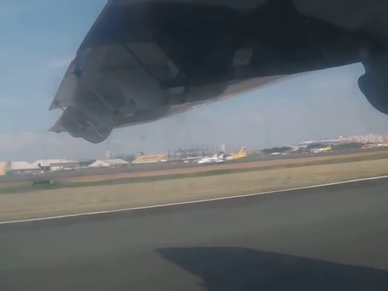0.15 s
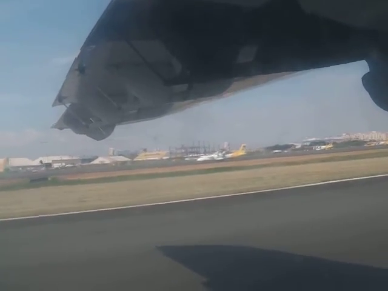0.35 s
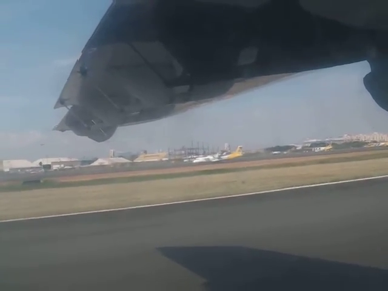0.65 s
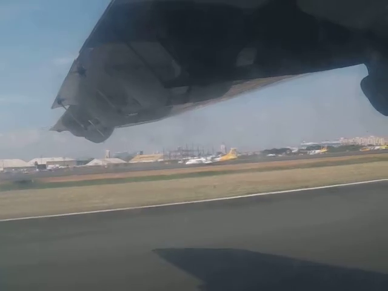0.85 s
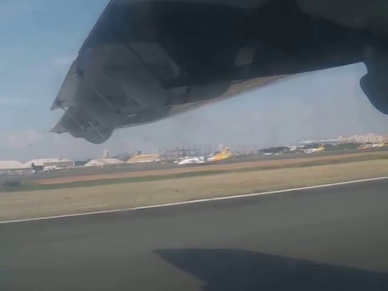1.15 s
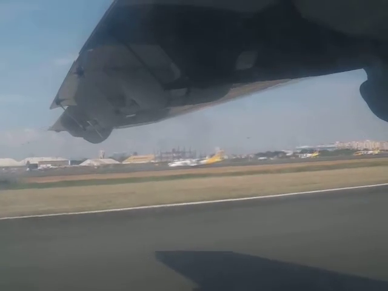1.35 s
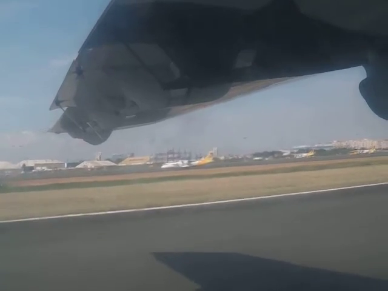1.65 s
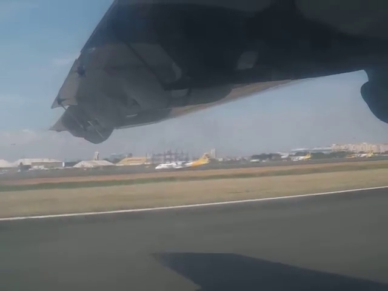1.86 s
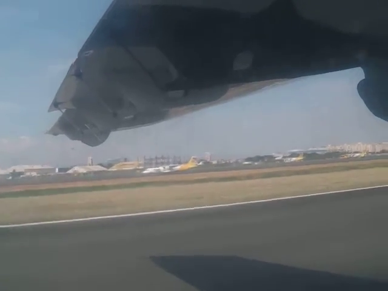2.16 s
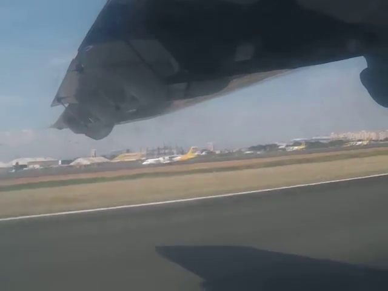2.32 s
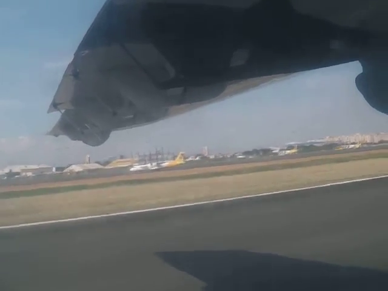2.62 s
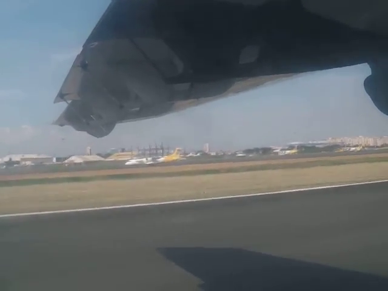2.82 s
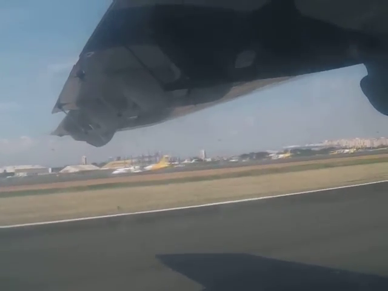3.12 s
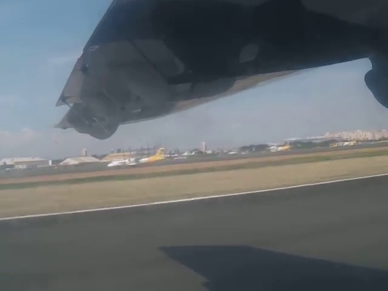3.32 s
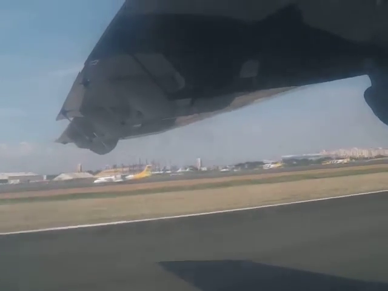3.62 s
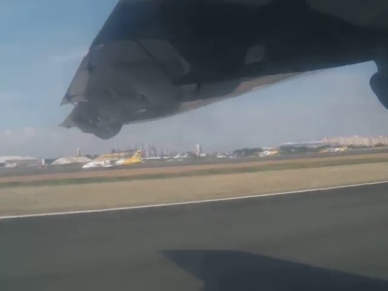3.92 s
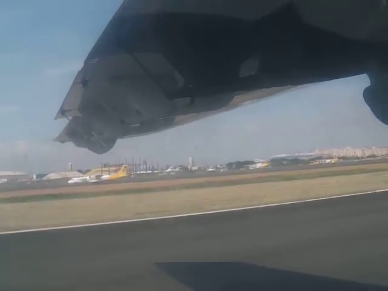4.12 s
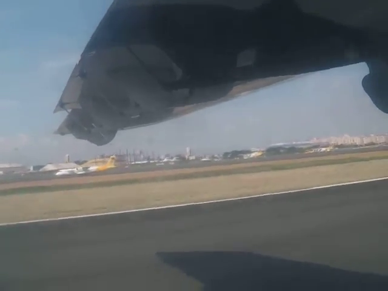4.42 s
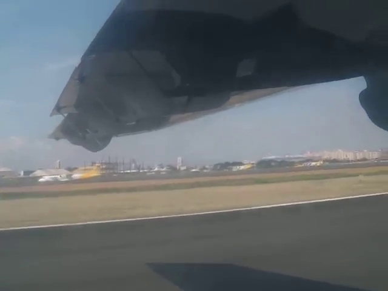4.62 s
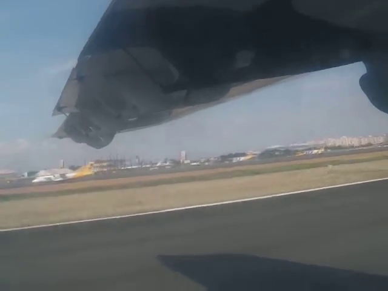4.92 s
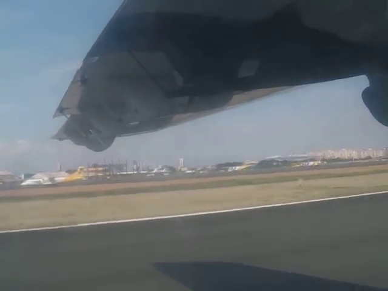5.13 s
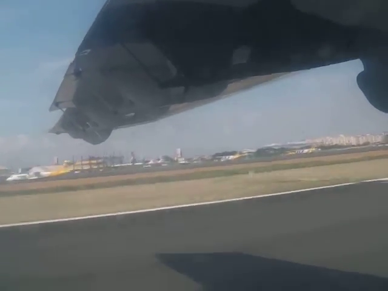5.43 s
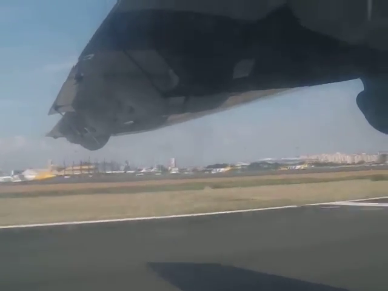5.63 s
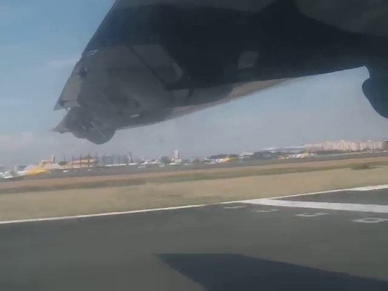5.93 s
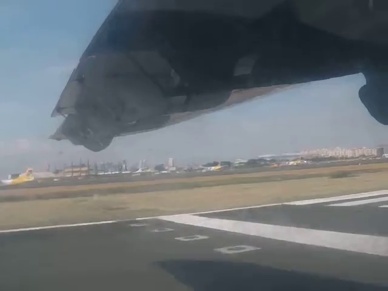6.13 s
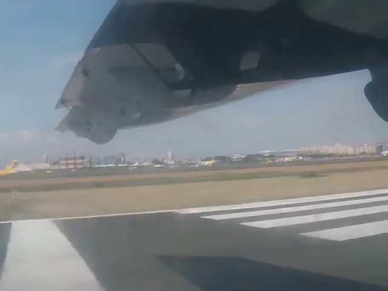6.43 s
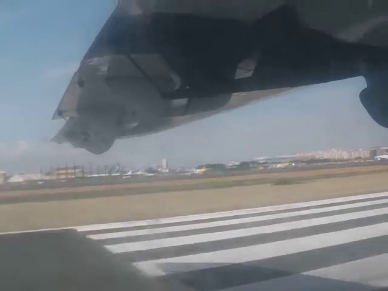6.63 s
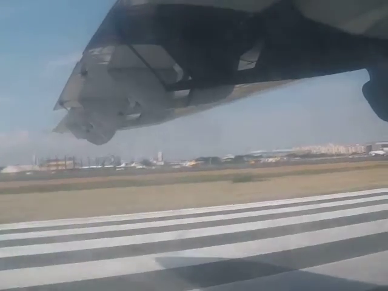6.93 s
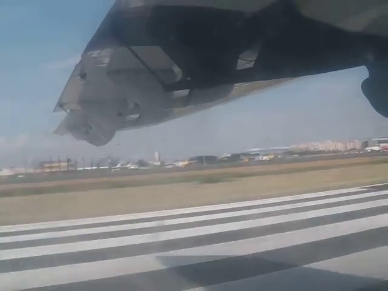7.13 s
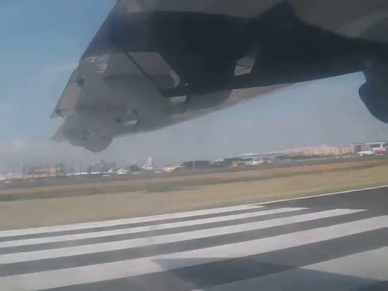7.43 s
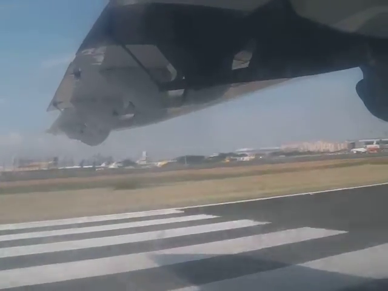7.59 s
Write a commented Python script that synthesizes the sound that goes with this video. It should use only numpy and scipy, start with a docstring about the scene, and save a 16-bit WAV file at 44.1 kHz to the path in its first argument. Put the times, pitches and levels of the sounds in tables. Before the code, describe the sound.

For nearly 8 seconds, a loud twin-propeller drone fills an aircraft cabin, heard by a microphone at a window seat while the plane rolls on the ground. Two deep, almost pure hums around 105 Hz beat together, with lulls about 0.6 s apart at first and 0.4 s by the end. In each lull automatic leveling lifts the roar of the vibrating wall; brief extra surges of roar and treble come near 0.3, 0.9, 2.6, 3.8 and 4.9 s, with smaller ones around 7. Rasping air hiss and a shimmering, very high turbine whistle near 12 kHz are chopped at the blade rate. A dry click lands at 0.8 s; short low thumps at 0.95, 2.0 and 4.9 s momentarily duck the sound. A thin wavering gear whine grows from about 3 s as a mid-band draught steadily fades. The drone continues to the end without stopping.

```python
"""A twin turboprop taxis, heard from a window seat for 7.8 s.
From the start two propeller hums beat, the lulls closing up from about 0.6 to 0.4 s apart; wash roars in the
cabin wall, intake air hisses and the compressor whistles as a comb of lines, all chopped at the blade rate;
roar and treble swell briefly, mostly in the lulls. A dry click falls at 0.8 s, short low thumps at 0.95, 2.0
and 4.9 s, each making the gain duck; a gear whine grows while the nacelle draught fades.
Throughout, a gain control holds the hum down and lets the roar swell each time the propellers cancel."""
import sys
import numpy as np
from scipy.fft import rfft, irfft, next_fast_len
from scipy.io import wavfile
from scipy.ndimage import uniform_filter1d, minimum_filter1d, map_coordinates

SR = 44100
rng = np.random.default_rng(int(sys.argv[2]) if len(sys.argv) > 2 else 0)


def master(y):
    """Save y as 16-bit WAV."""
    cut = np.clip(np.atleast_2d(y).T, -1, 1)
    pcm = np.round(cut * 32767)  # scale
    wavfile.write(sys.argv[1], SR, pcm.astype(np.int16))


N = 342216
TIME = np.arange(N) / SR  # s


def amp(db):
    """Decibels to amplitude gain."""
    return np.exp(np.asarray(db) * np.log(10) / 20)


def unit(x):
    """Scale to rms 1."""
    return x / np.sqrt(np.mean(x ** 2) + 1e-20)


def along(points, hz):
    """Interpolate (f/Hz, value) points on a log frequency axis."""
    f, v = np.transpose(points)
    return np.interp(np.log(hz + 1), np.log(f + 1), v)


def curve(points):
    """Interpolate (t/s, value) points to one value per sample."""
    t, v = np.transpose(points)
    return np.interp(TIME, t, v)


def wobble(rate_hz):
    """Smooth random curve: a cubic spline through rate_hz normal knots a second."""
    knots = rng.standard_normal(int(N * rate_hz / SR) + 4)
    coarse = TIME[::64]
    return np.interp(TIME, coarse, map_coordinates(knots, [coarse * rate_hz]))


def swells(rows):
    """Sum of Gaussian lifts in dB from (t/s, half length/s, lift/dB) rows."""
    return sum(db * np.exp(-((TIME - t) / half_s) ** 2) for t, half_s, db in rows)


def tone(turns):
    """Sine of rms 1 from its phase in turns."""
    return np.sqrt(2) * np.cos(2 * np.pi * (turns - np.floor(turns)).astype(np.float32))


def filtered(x, response):
    """Multiply the spectrum of x by a response of frequency in Hz."""
    m = next_fast_len(N + 8192)
    return irfft(rfft(x, m) * response(np.fft.rfftfreq(m, 1 / SR)), m)[..., :N]


def noise(spectrum):
    """Stereo noise of rms 1: alike left and right in the bass, unlike to opposed in the treble."""
    # left-right correlation: f/Hz, correlation/-1..1
    alike = [(100, .996), (500, .999), (1200, .985), (1500, .95), (2000, .65), (3300, .5), (5500, .42),
             (7000, .1), (9000, 0), (11500, -.45), (15000, -.46)]

    def colour(hz):
        turn_rad = np.arccos(np.clip(along(alike, hz), -1, 1)) / 2
        return amp(along(spectrum, hz)) * np.array([np.cos(turn_rad), np.sin(turn_rad)])

    mid, side = filtered(rng.standard_normal((2, N)), colour)
    return unit(np.array([mid + side, mid - side]))


def propellers():
    """Blade passages so far; the near propeller gains one blade on the far one from lull to lull."""
    # blade-passing rate, mean of both propellers: t/s, f/Hz
    blade_rate = [(0, 105.6), (1.1, 105.7), (2.2, 106.4), (3.5, 105.6), (5.1, 104.6), (6.1, 105.2),
                  (7.76, 104.7)]
    # lulls, where the two hums cancel: t/s
    lull_times = [-.3, .245, .835, 1.385, 1.95, 2.575, 3.215, 3.746, 4.332, 4.85, 5.33, 5.728, 6.11, 6.49,
                  6.84, 7.23, 7.625, 8.02]
    mean = np.cumsum(curve(blade_rate)) / SR
    # half a blade apart at each lull
    lead = np.interp(TIME, lull_times, np.arange(len(lull_times)) + .5)
    return mean + lead / 2, mean - lead / 2


def chop(blades, depth, sharpness):
    """Gain of rms 1 that rises in a burst at every blade passage."""
    return unit(1 + depth * np.exp(sharpness * (np.cos(2 * np.pi * blades) - 1)))


def surges():
    """Brief swells, mostly in the hum lulls: lift in dB of the wall roar, and of the rush and treble."""
    # t/s, half length/s, wall lift/dB, rush and treble lift/dB
    surge_rows = [(.262, .07, 4.5, 6), (.89, .075, 4.5, 6.5), (1.956, .015, 2.5, 4),
                  (2.585, .055, 3.5, 6.5), (3.19, .09, 2.5, 4), (3.81, .075, 4, 5.5), (4.9, .045, 5, 5),
                  (5.76, .04, 4.5, 2.5), (6.951, .02, 5, 2), (7.245, .06, 3, 3.5)]
    wall_surge_db = swells((t, half_s, wall_db) for t, half_s, wall_db, _ in surge_rows)
    air_surge_db = swells((t, half_s, air_db) for t, half_s, _, air_db in surge_rows)
    return wall_surge_db, air_surge_db


def click(at_s, level_db, t60_s):
    """One dry click: a sudden step that decays at once."""
    age_s = np.maximum(TIME - at_s, 0)
    return -amp(level_db - 60 * age_s / t60_s) * (TIME >= at_s)


def thumps(ring_hz, width_s):
    """Short low thumps: each is a cosine in a Gaussian envelope, strong enough to make the gain duck."""
    # t/s, peak/dB
    thump_rows = [(.95, 7), (1.965, 6.5), (4.916, 6)]
    out = np.zeros(N)
    for t, peak_db in thump_rows:
        near_by = np.abs(TIME - t) < 5 * width_s
        age_s = TIME[near_by] - t
        pulse = np.exp(-(age_s / width_s) ** 2) * np.cos(2 * np.pi * ring_hz * age_s)
        out[near_by] += amp(peak_db) * pulse
    return out


def draught(start_db, fade_db_per_s):
    """Air drawn past the nacelle: band noise that fades steadily."""
    # spectrum: f/Hz, relative density/dB
    nacelle = [(900, -10), (1600, 0.5), (1900, 0), (2750, -4.5), (3200, -14), (5000, -45)]
    return amp(start_db - fade_db_per_s * TIME) * noise(nacelle)


def gearbox(mesh_hz, flutter_hz, flicker_db):
    """Gear mesh: a thin tone with random pitch flutter, growing out of the roar and flaring briefly."""
    # whine level: t/s, level/dB
    growth = [(0, -55), (2.8, -45), (4.8, -41.5), (7.76, -40)]
    # flares: t/s, half length/s, lift/dB
    flares = [(3.3, .05, 6), (4.95, .05, 7), (5.4, .09, 4), (6.85, .04, 5), (7.25, .04, 8)]
    turns = np.cumsum(mesh_hz + flutter_hz * wobble(70)) / SR
    level_db = curve(growth) + swells(flares) + flicker_db * wobble(14)
    port_db = np.array([wobble(13), wobble(6.1)])
    return amp(level_db + port_db) * tone(turns)


def whistle(near, level_db):
    """The propeller chops the compressor tone into a comb of thin lines, each waxing and waning alone."""
    # compressor blade tone: t/s, f/Hz
    turbine = [(0, 11998), (.5, 11988), (.95, 11968), (1.25, 11992), (1.8, 12068), (2.15, 12070),
               (2.75, 12020), (3.3, 12010), (3.6, 11980), (3.95, 11918), (4.5, 11885), (5.15, 11857),
               (6.1, 11882), (7.1, 11912), (7.76, 11917)]
    # lines: order/blade-passing rates, level at t=0/dB, drift/(dB/s), lag between ports/turns
    sidebands = [(-7, -13, .6, .36), (-6, -11, 0, .41), (-4, -5.5, 1.2, .3), (-3, -8, .3, .45),
                 (-2, -6, .5, .37), (-1, -3, -.1, .42), (0, 2, -.7, .4), (1, -3, -1.2, .38),
                 (2, -5.5, .6, .41), (3, -9, 1.3, .45), (4, -16, 1.1, .5)]
    # spells in which one line sings out: order, t/s, half length/s, lift/dB
    streaks = [(-2, .2, .35, 6), (-2, 1.1, .45, 6), (0, 1.6, .2, 3), (-4, 2.7, .45, 8), (-6, 3.05, .35, 10),
               (-7, 3.2, .4, 7), (-1, 3.6, .7, 5), (3, 4.2, .25, 6), (2, 4.3, .25, 3), (3, 5.6, .25, 4),
               (3, 7.1, .45, 4), (0, 7.2, .6, 6)]
    fade_db, wander_turns, lag_sway_turns = 2.2, .135, .1  # random swing of each line
    carrier = np.cumsum(curve(turbine) + 3 * wobble(25)) / SR
    out = np.zeros((2, N))
    for order, line_db, drift_db_per_s, lag_turns in sidebands:
        line = carrier + order * near + wander_turns * wobble(16)
        streak_db = swells(spell for which, *spell in streaks if which == order)
        gain = amp(line_db + drift_db_per_s * TIME + streak_db + fade_db * wobble(13))
        for port in range(2):
            phase = line - port * lag_turns + lag_sway_turns * wobble(6)
            out[port] += gain * amp(wobble(8.8)) * tone(phase)
    return amp(level_db) * unit(out)


def air(near, hiss_db, intake_db, hiss_ease_db_per_s):
    """Blade-tip hiss, easing off steadily, and a narrow intake rush, both rasping at the blade rate."""
    # spectra: f/Hz, relative density/dB
    hiss_spectrum = [(2000, -22), (3200, -6.5), (5000, 5), (6000, 0.5), (7400, 7), (8300, -39), (9600, -11),
                     (11000, 18), (13200, 9), (14300, -3), (15000, -22)]
    intake_spectrum = [(8500, -61), (10000, -13), (10500, -8), (10850, -5), (11100, -0.5), (11450, 2.5),
                       (12100, -2), (12300, -15), (12550, -12), (12750, -10), (14000, -43)]
    hiss_now_db = hiss_db - hiss_ease_db_per_s * TIME + 0.36 * wobble(8.0)
    hiss = amp(hiss_now_db) * noise(hiss_spectrum)
    intake = amp(intake_db + 0.56 * wobble(9)) * noise(intake_spectrum)
    return (hiss + intake) * amp(0.55 * wobble(24)) * chop(near, depth=0.36, sharpness=15)


def panels(hz):
    """Gain of the trim panels' narrow resonances."""
    # f/Hz, width/Hz, lift/dB
    resonances = [(875, 37, 2), (1010, 25, 3), (1170, 15, 2.5), (1365, 18, -3), (1430, 35, 2.5),
                  (1665, 34, 5.5), (1925, 25, 4.5), (2160, 17, 3.5), (2630, 25, 3.5), (2715, 30, 5)]
    return amp(sum(db * np.exp(-((hz - centre_hz) / width_hz) ** 2)
                   for centre_hz, width_hz, db in resonances))


def wash(near, wall_surge_db, air_surge_db, rumble_db, wall_db, rush_db):
    """Turbulent air and rolling tyres shake the cabin; the wall rings in two broad humps."""
    # wash strength: t/s, relative level/dB
    strength = [(0, 0), (1, .7), (1.6, -1), (2.3, 0), (3.2, .7), (4.35, .3), (4.9, 1), (5.35, -1),
                (5.75, .2), (6.15, -.8), (6.9, 1.8), (7.3, 1.2), (7.76, -1.8)]
    # spectra: f/Hz, relative density/dB
    rumble_spectrum = [(15, -21), (28, -8), (45, -9), (64, -9), (80, -1), (94, -1), (140, 0.5), (175, -5),
                       (222, -14.5), (255, -10.5), (300, -16.5), (420, -42.5)]
    wall_spectrum = [(200, -80), (300, -14.5), (350, -7), (394, -0.5), (420, -2), (452, -10.5), (490, 0),
                     (538, .5), (580, -7.5), (630, -12.5), (700, -23), (1000, -47)]
    rush_spectrum = [(450, -22), (700, 1), (1100, 0.5), (1300, -3), (1450, -5), (1560, -11), (2100, -10.5),
                     (2350, -7), (2700, -10), (3000, -18), (3800, -20), (6000, -35)]
    eddy_rate_hz, wall_flutter_db, rush_flutter_db = 42, 1.3, 1.7
    strength_db = curve(strength)
    eddies = wobble(eddy_rate_hz)
    rumble = amp(rumble_db + 0.4 * strength_db + 1.1 * wobble(4.4)) * noise(rumble_spectrum)
    wall_now_db = wall_db + strength_db + wall_surge_db + wall_flutter_db * eddies
    wall = amp(wall_now_db) * noise(wall_spectrum) * chop(near, depth=0.18, sharpness=2.7)
    rush_now_db = rush_db + strength_db + air_surge_db + rush_flutter_db * eddies
    panel_noise = unit(filtered(noise(rush_spectrum), panels))
    rush = amp(rush_now_db) * panel_noise * chop(near, depth=0.48, sharpness=2.1)
    return rumble + wall + rush


def hum(near, far, near_db, far_db, octave_db, waver_db):
    """Each propeller presses a nearly pure tone through the fuselage; the far one adds a faint octave."""
    # hum strength: t/s, relative level/dB
    strength = [(0, -0.5), (1.7, -1.8), (2.9, 0.5), (4.5, -1), (5.1, 0.8), (5.6, -0.6), (6.7, -1.5),
                (7.45, .8)]
    first = amp(near_db + waver_db * wobble(8.1)) * tone(near)
    second = amp(far_db + waver_db * wobble(11.0)) * tone(far)
    octave = amp(octave_db + 1.7 * wobble(1.88)) * tone(2 * far)
    return amp(curve(strength)) * (first + second + octave)


def scene():
    """Sum every source at the window seat, then lean it left or right by frequency."""
    # louder side: f/Hz, left minus right/dB
    lean = [(100, -.75), (400, -.3), (1300, -.8), (2000, -0.5), (3000, 4), (5000, -1), (8500, 1.5),
            (10500, -1.2), (12500, 1)]
    near, far = propellers()
    wall_surge_db, air_surge_db = surges()
    small = click(at_s=.769, level_db=3.5, t60_s=0.0017) + thumps(ring_hz=117, width_s=0.0027)
    nacelle_air = draught(start_db=-32.5, fade_db_per_s=1)
    gears = gearbox(mesh_hz=2316, flutter_hz=22.03, flicker_db=1.9)
    # the whistle swells by half as many dB as the air
    compressor = amp(air_surge_db / 2) * whistle(near, level_db=-25.7)
    treble_air = air(near, hiss_db=-30.5, intake_db=-27.0, hiss_ease_db_per_s=.12)
    high = amp(air_surge_db) * treble_air + compressor
    roar = wash(near, wall_surge_db, air_surge_db, rumble_db=-12.0, wall_db=-11.0, rush_db=-24.0)
    drone = hum(near, far, near_db=-6.5, far_db=-10.0, octave_db=-29.5, waver_db=0.07)
    total = small + nacelle_air + gears + high + roar + drone
    return filtered(total, lambda hz: amp(along(lean, hz) * [[.5], [-.5]]))


def gain_control(x, threshold_db, ceiling_db, size=128, count=15):
    """Cut a share of the level above threshold, duck at once for peaks over the ceiling, recover steadily."""
    gain_share, backoff_db, release_db_per_s = .9, 1.3, 36  # backoff: extra duck after a peak
    starts = np.arange(0, N, size)
    power = uniform_filter1d(np.add.reduceat(np.mean(x ** 2, axis=0), starts) / size, count)
    levels_db = 10 * np.log10(np.abs(power) + 1e-9)
    peaks_db = 20 * np.log10(np.maximum.reduceat(np.abs(x).max(axis=0), starts) + 1e-9)
    gain_db, now_db = [], 0
    for level_db, peak_db in zip(levels_db, peaks_db):
        recovered_db = now_db + release_db_per_s * size / SR
        now_db = min(recovered_db, gain_share * (threshold_db - level_db), 0)
        if peak_db + now_db > ceiling_db:
            now_db = ceiling_db - peak_db - backoff_db
        gain_db.append(now_db)
    # look one block ahead: the gain is down before the peak arrives
    held_db = minimum_filter1d(gain_db, size=3)
    return x * amp(np.interp(np.arange(N), starts + size / 2, held_db))


def record(dry):
    """Even out the level, cut one narrow notch and drop everything above the band limit."""
    notch_hz, notch_width_hz, top_hz = 7880, 150, 15050
    held = gain_control(dry, threshold_db=-8.0, ceiling_db=-0.48)

    def response(hz):
        notch = 1 - .97 * np.exp(-((hz - notch_hz) / notch_width_hz) ** 2)
        return notch * (hz < top_hz)

    return filtered(held, response)


dry = scene()
out = record(dry)
master(out)
```